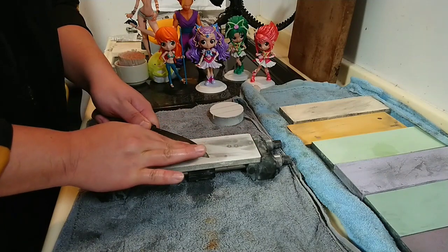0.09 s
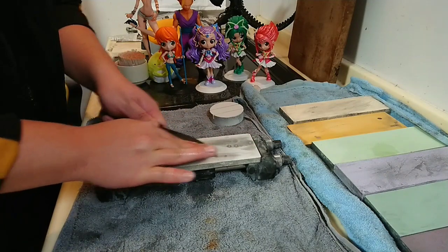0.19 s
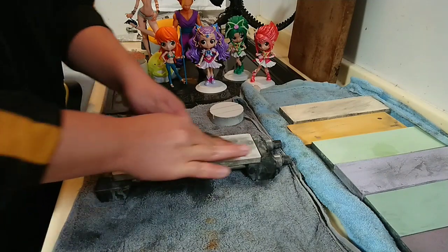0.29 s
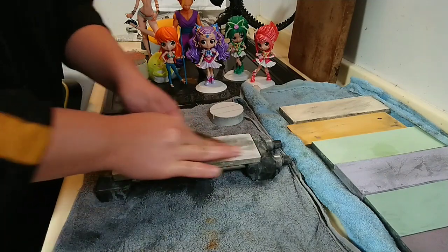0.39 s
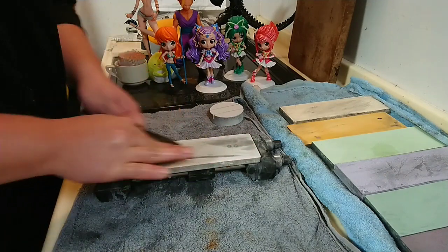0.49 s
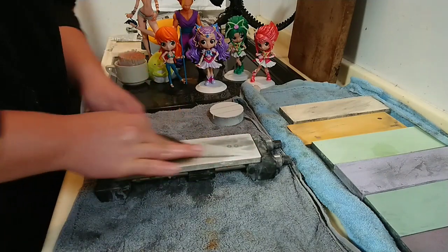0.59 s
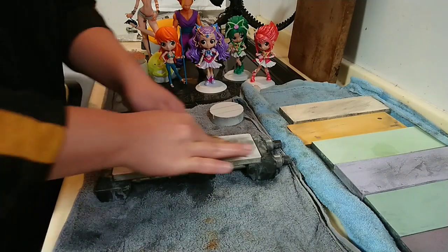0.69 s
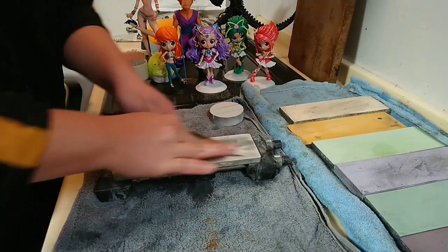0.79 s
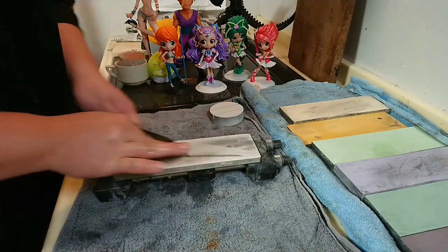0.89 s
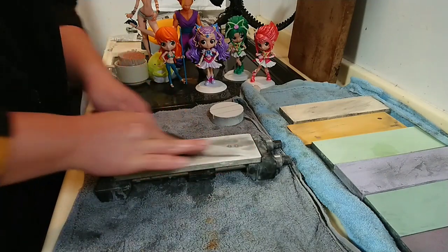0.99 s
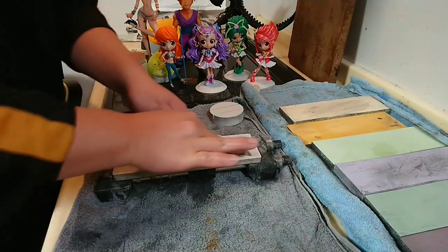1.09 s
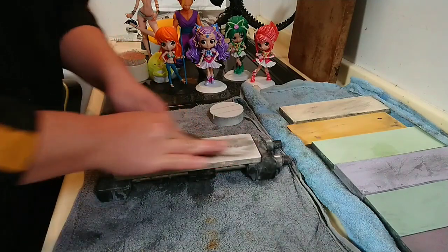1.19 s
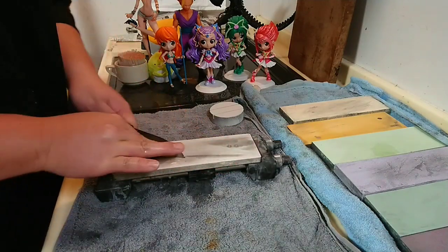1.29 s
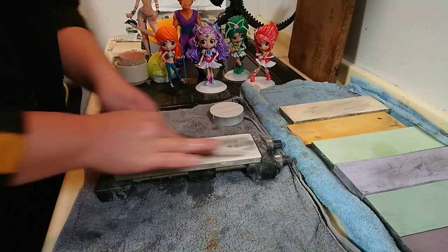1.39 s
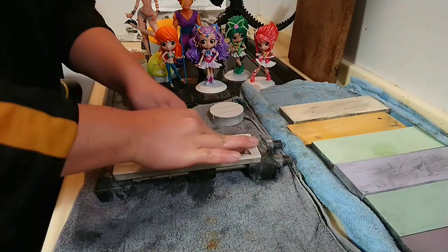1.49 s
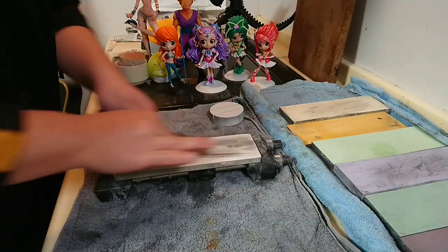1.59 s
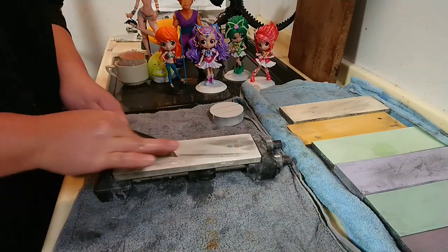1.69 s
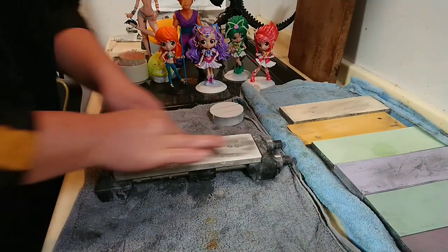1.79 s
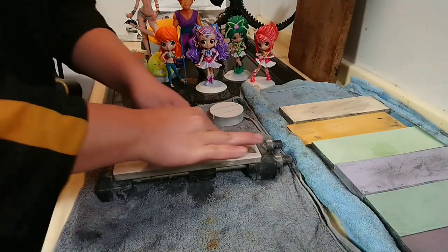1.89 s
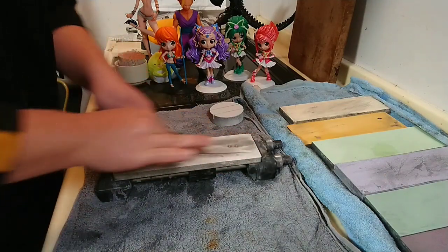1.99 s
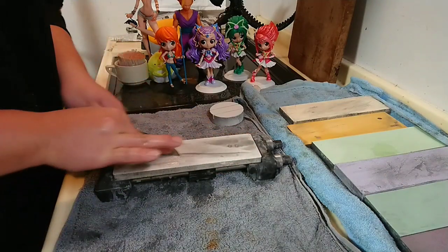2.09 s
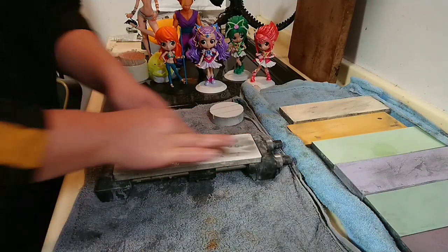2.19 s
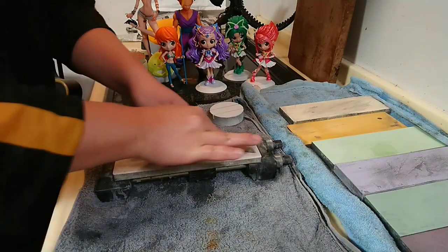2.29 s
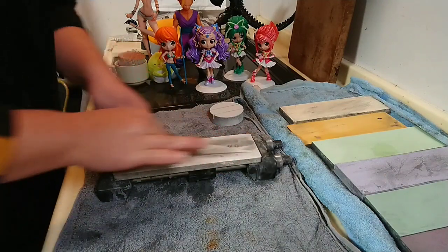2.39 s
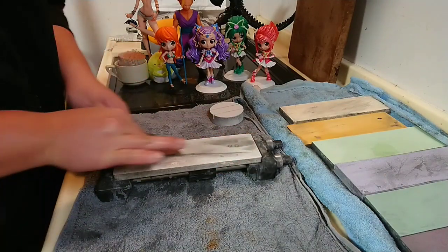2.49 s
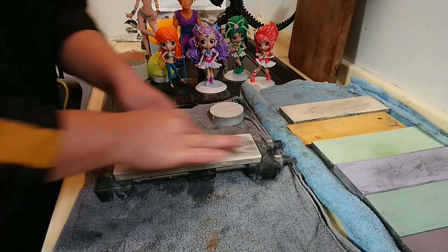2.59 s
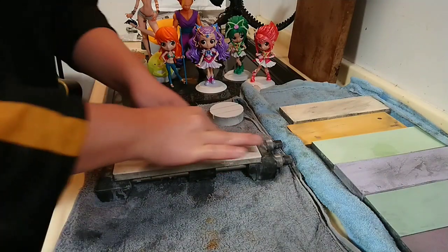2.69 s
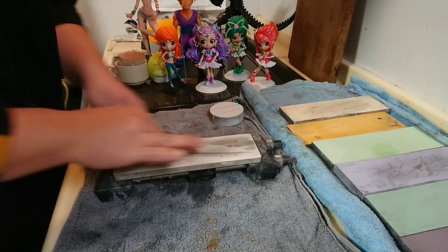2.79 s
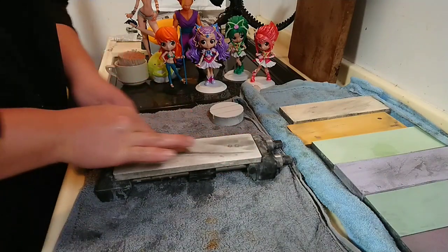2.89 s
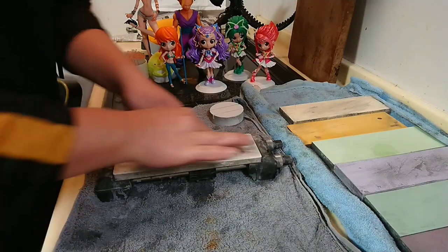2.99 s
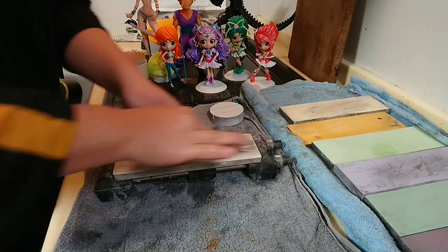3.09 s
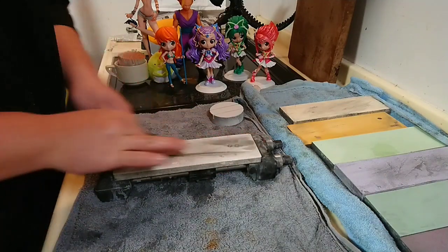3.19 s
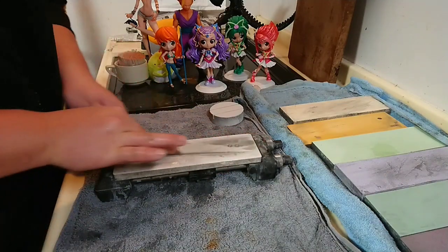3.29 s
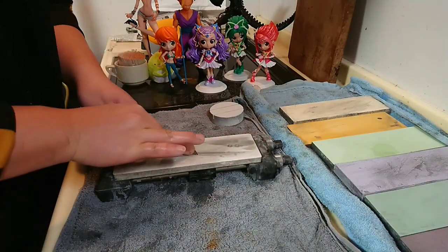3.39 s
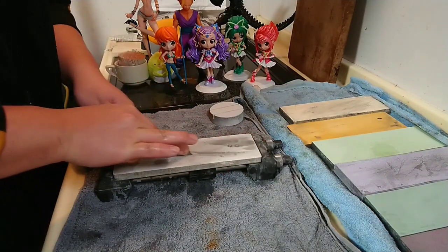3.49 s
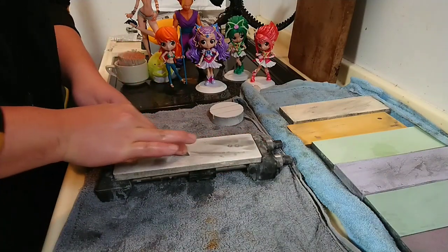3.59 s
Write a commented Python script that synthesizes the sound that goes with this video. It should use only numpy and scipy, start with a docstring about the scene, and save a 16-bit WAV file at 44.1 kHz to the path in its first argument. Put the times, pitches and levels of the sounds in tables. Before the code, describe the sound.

After a brief quiet and a tiny steel touch, rapid bright scrapes of a knife on a sharpening stone run almost without gaps, over soft low rumbles, then weaken with quick ticks. Close stereo microphones indoors.

```python
"""Quiet air, a tiny touch of steel, then a small knife is pushed and pulled along a wet whetstone on a counter,
close to two microphones. Grit clicks and hisses under the edge and rings the blade; colour shifts with the place
on the stone. From the second stroke on, each turn jolts a low rumble into the counter, and here and there a band
sings out or the counter hums. The last strokes are fainter, with quick catches of the edge among them."""
import sys
import numpy as np
from scipy import signal
from scipy.fft import rfft, irfft
from scipy.io import wavfile
from scipy.ndimage import uniform_filter1d

SR = 44100
rng = np.random.default_rng(int(sys.argv[2]) if len(sys.argv) > 2 else 0)


def linear_from_db(decibels):
    """Turn decibels (scalar or array-like) into linear amplitude factors; 0 gives 1."""
    return 10 ** (np.asarray(decibels, float) / 20)


def put_to_file(sound):
    """Save the sound as 16-bit audio at rate SR, in the file named by the first command-line argument."""
    columns = np.atleast_2d(sound).T  # one column per channel
    safe = np.clip(columns, -1, 1)
    whole_steps = np.round(safe * 32767)
    wavfile.write(sys.argv[1], SR, whole_steps.astype(np.int16))


N = 160965  # length in samples

# Background air, a noise spectrum: f/Hz, relative level/dB
AIR_SPECTRUM = [(30, 1), (150, -6.5), (300, -26), (1410, -27), (4500, -39), (10000, -29), (15000, -42)]
AIR_DB = -66  # rms in each microphone

# Alternate pushes and pulls, each ending where the next begins:
# start t/s, level/dB, swell from start to end/dB, bulge/dB (middle up, both ends down by this much)
STROKES = [(0.159, -30, 9, 0), (0.372, -27.5, 1, 1.5), (0.574, -26.5, 5.5, 1), (0.761, -29, -1, 2),
           (0.962, -27, 7.5, 0.5), (1.15, -27, -8.5, 1.5), (1.341, -26, 6.5, 1), (1.525, -27, -4, 0),
           (1.728, -26, 5.5, -0.5), (1.921, -27, -6, 0.5), (2.117, -26, 5, -1.5), (2.308, -26, 2.5, -0.5),
           (2.501, -26.5, 8, -0.5), (2.697, -28, -12, 0.5), (2.896, -26.5, 10, 0), (3.08, -26.5, -3.5, 1),
           (3.285, -34, -9.5, 2.5), (3.438, -43.5, -3, 1.5), (3.605, -44.5, -13, 14)]
LAST_END_S = 3.73
# The blade speeds out of each turn and slows into the next
RISE_S, FALL_S, TURN_DB, BEND = 0.046, 0.06, -22.5, 1.98
FIRST_RISE_S = 0.058  # fade-in of the first stroke
# The edge is set down or catches on the stone: t/s, level/dB, fade time constant/s
TOUCHES = [(0.1335, -61, 0.0056), (0.7786, -35, 0.007), (1.742, -39, 0.013), (2.909, -35, .005),
           (3.481, -37, .003), (3.501, -36, .003), (3.517, -37, .003), (3.617, -46, 0.0021)]
SETTLE_DB = -60  # faint creep from the first touch on
# The edge bites harder for a moment: t/s, boost/dB
BITES = [(0.245, 5.5), (0.489, 3.5), (0.618, 3), (1.865, 1.5), (2.555, 3.5), (2.592, 1)]
BITE_S = 0.013  # bell-curve spread

# Grit: clicks per second, size spread in dB, hiss against clicks as an rms ratio
GRAINS_PER_S, SPREAD_DB, HISS = 6000, 1.5, 0.85
DRAG_DB, DRAG_S = 1.0, 0.0094  # rms swing and smoothing window of the unsteady drag

# Ringing modes of the blade: f/Hz, level over the direct scrape/dB
BLADE_MODES = [(2680, 2), (2894, 3), (3708, 3), (5614, 2), (8886, 1)]
BLADE_T60_S = 0.069

# Scrape colour: f/Hz, left level/dB, right level/dB, change from near to far end of the stone left/dB,
# the same right/dB, left-right likeness (0 to 1)
COLOUR = [(427, -17, -28, -8.5, -11, 0.4), (872, -12.5, -19, -2, -2, 0.34), (996, -18, -22.5, 4.5, 0, 0.13),
          (1413, -4, -3.5, -7.5, -10.5, 1), (2050, -10, -9, -8, -6, 0.27), (2940, -6, -6, 2.5, -1.5, 0.054),
          (3250, 0.5, 1.5, -11, 4.5, 0.26), (3770, 1.5, -7, 3.5, -13, 0.72), (4490, 2, -3, -3, 6.5, 0.038),
          (5190, 10, -27.5, -5.5, -27, 0.085), (5290, 9, -9, 9, -14, .13), (6000, 3.5, 9, -6, 2, .05),
          (6440, -1.5, 1, -3, -7, 0.045), (6840, 6.5, 10, -3, -0.5, 0.51),
          (7830, -3.5, -3, 3.5, -6.5, 0.78), (8840, 1.5, -2.5, -6, -1.5, 0.87),
          (12500, -4, -7.5, -3.5, 0.5, 0.46), (14300, -5.5, -5.5, -2, -3.5, 0.44)]
PATCH_DB = 2.5  # rms of the flicker in colour
# Corner frequencies of the three colour shifts below: f/Hz
LEAN_HZ = [500, 1440, 3800, 12000]
# Colour shift on pulls, at those corners: level/dB
PULL_DB = [5, -1.5, -0.5, -2.5]
# Colour shift as the blade slows, at those corners: level/dB
SLOW_DB = [15, 1.8, 5.1, 0.5]
# Colour shift from start to end, as the hands move along the blade, at those corners: level/dB
DRIFT_DB = [-1, -1, -2.5, 3.7]
# One band of the scrape sings out for part of a stroke: t/s, f/Hz, boost/dB
SINGS = [(.62, 6070, 9.5), (1.25, 3820, 12.5), (2.96, 8850, 6.5), (3.17, 1690, 18)]
SING_S, SING_OCTAVES = 0.016, 0.1  # spreads in time and pitch
LEAD_S, LEAD_TOP_HZ = 0.00016, 6200  # the left microphone hears the part below this first
# Below this frequency little of the scrape is heard during strokes, least of all on pushes
HOLLOW_HZ, HOLLOW_PUSH_DB, HOLLOW_PULL_DB = 720, -33, -11
WET_DB, ROOM_T60_S = -7.5, 0.2

# Counter rumble, a noise spectrum: f/Hz, relative level/dB
COUNTER_SPECTRUM = [(30, -19), (42, 0.5), (54, 3.5), (75, -0.5), (110, -5.5), (135, -11.5), (175, -14),
                    (198, -8), (240, -16.5), (400, -28.5)]
JOLT_DB = -20  # against the stroke level, before the jolt's envelope and doubling
JOLT_RISE_S, JOLT_DECAY_S, RUB_DB = 0.012, 0.081, -48.5
COUNTER_SAME, COUNTER_RIGHT_DB = 0.8, -7.5  # left-right likeness, right against left
LUMP_DB, LUMP_S = 2.2, 0.03  # the rumble comes unevenly: rms swing, smoothing window
# The counter hums briefly on one low note: t/s, f/Hz, peak level/dB
HUMS = [(.61, 199, -52.5), (1.16, 104.4, -43), (1.43, 109.3, -42), (1.56, 215.9, -50.5), (3.53, 113.3, -45),
        (3.63, 111.3, -48)]
HUM_S = 0.047  # bell-curve spread

NOTCH_HZ, NOTCH_WIDTH_HZ = 5920, 650  # narrow hole in the right microphone, width per pass
EDGE_HZ = 15850  # top of the microphones' band


def evened(x):
    """Scales a signal to an rms of one."""
    return x / np.sqrt(np.mean(x ** 2) + 1e-20)


def bell(distance, spread):
    """Smooth bell curve with a peak of one."""
    return np.exp(-(distance / spread) ** 2 / 2)


def wander(window_s):
    """Slow random swing of unit rms: noise smoothed twice."""
    size = int(window_s * SR)
    return evened(uniform_filter1d(uniform_filter1d(rng.standard_normal(N), size), size))


def coloured(points, count):
    """Steady unit-rms noises with the spectrum of the table."""
    hz = np.fft.rfftfreq(N, 1 / SR)
    f, db = np.transpose(points)
    gain = linear_from_db(np.interp(np.log(hz + 1), np.log(f + 1), db, -90, -90))
    return np.array([evened(irfft(rfft(x) * gain, N)) for x in rng.standard_normal((count, N))])


def air():
    """Steady background noise, independent in the two microphones."""
    return linear_from_db(AIR_DB) * coloured(AIR_SPECTRUM, count=2)


def motion():
    """Hands: scrape force, place (0 near, 1 far), (pull, slowness, drift), time since turn, jolt, fade-in."""
    t = np.arange(N) / SR
    start, level_db, swell_db, bulge_db = np.transpose(STROKES)
    edges = np.append(start, LAST_END_S)
    k = np.clip(np.searchsorted(edges, t) - 1, 0, len(start) - 1)  # stroke number
    since, left = np.maximum(t - start[k], 0), edges[k + 1] - t
    progress = since / (since + left)
    slow = np.clip(1 - since / RISE_S, 0, 1) ** BEND + np.clip(1 - left / FALL_S, 0, 1) ** BEND

    db = level_db[k] + swell_db[k] * (progress - 0.5)
    db = db - bulge_db[k] * np.cos(2 * np.pi * progress) + TURN_DB * slow
    db = db + sum(bite_db * bell(t - s, BITE_S) for s, bite_db in BITES)
    first = np.clip((t - start[0]) / FIRST_RISE_S, 0, 1)
    force = linear_from_db(db) * first + linear_from_db(SETTLE_DB) * (t > TOUCHES[0][0])
    for s, touch_db, fade in TOUCHES:
        force = force + linear_from_db(touch_db) * (t > s) * np.exp(-np.maximum(t - s, 0) / fade)
    force = uniform_filter1d(force, 16)

    place = 0.5 - 0.5 * np.cos(np.pi * progress) * (-1) ** k
    pull = uniform_filter1d(k % 2 * 1.0, 1000)
    drift = t / t[-1] - 0.5
    jolt = linear_from_db(level_db[k] + JOLT_DB) * (k > 0)
    return force, place, (pull, slow * first, drift), since, jolt, first


def grit():
    """Abrasive grains: random clicks of uneven size over fine hiss, with an unsteady drag."""
    size = linear_from_db(SPREAD_DB * np.minimum(rng.exponential(1, N), 4.5))
    struck = rng.random(N) < GRAINS_PER_S / SR
    clicks = size * struck * rng.choice([-1, 1], N)
    rough = evened(clicks) + HISS * rng.standard_normal(N)
    return evened(rough * linear_from_db(DRAG_DB * wander(DRAG_S)))


def blade(x):
    """The grit passes directly and also rings the decaying modes of the steel."""
    out = x
    for hz, db in BLADE_MODES:
        r = np.exp(-np.pi * 2.2 / BLADE_T60_S / SR)  # decay per sample
        turn = np.exp(2j * np.pi * hz / SR)
        out = out + linear_from_db(db) * 2 * signal.lfilter([1 - r], [1, -r * turn], x).real
    return out


def room(x):
    """Short sparse tail of decaying echoes, different for each side."""
    t = np.arange(SR // 3) / SR
    taps = rng.choice([-1.0, 1.0], (2, len(t))) * (rng.random((2, len(t))) < 0.05)
    taps = taps * linear_from_db(-60 * t / ROOM_T60_S) * (t > 0.003)
    return signal.fftconvolve(x, taps / np.linalg.norm(taps[0]), axes=1)[:, :N]


def scrape(force, place, manner):
    """Two streams of grit ring the blade, then are mixed and coloured for each side by place and motion."""
    hz, t, z = signal.stft(blade(np.array([grit(), grit()]) * force), SR, nperseg=256, noverlap=192)
    clock = np.arange(N) / SR
    f, *columns = np.transpose(COLOUR)
    left_db, right_db, far_left_db, far_right_db, same = (np.interp(hz, f, c)[:, None] for c in columns)
    same = np.clip(same, 0, 1)
    far = np.interp(t, clock, place) - 0.5

    patch = uniform_filter1d(uniform_filter1d(rng.standard_normal((len(t), len(hz))), 45, 0), 2, 1)
    shift_db = PATCH_DB * evened(patch).T
    for db, share in zip((PULL_DB, SLOW_DB, DRIFT_DB), manner):
        lean = np.interp(np.log(hz + 1), np.log(LEAN_HZ), db)
        shift_db = shift_db + np.outer(lean, np.interp(t, clock, share))
    for s, sing_hz, db in SINGS:
        band = bell(np.log2(hz / sing_hz + 1e-9), SING_OCTAVES * np.sqrt(0.5) * np.sqrt(2))
        shift_db = shift_db + db * np.outer(band, bell(t - s, SING_S))

    # The level falls steeply below the lowest table frequency
    shared = np.clip(hz / f[0], 0, 1)[:, None] ** 4 * linear_from_db(shift_db)
    lead = (2 * np.pi * hz * LEAD_S * (hz < LEAD_TOP_HZ))[:, None]
    left = z[0] * linear_from_db(left_db + far_left_db * far) * shared
    right = same * np.exp(-1j * lead) * z[0] + np.sqrt(1 - same ** 2) * z[1]
    right = right * linear_from_db(right_db + far_right_db * far) * shared
    direct = signal.istft(np.array([left, right]), SR, nperseg=256, noverlap=192)[1][:, :N]
    direct = direct * np.sqrt(np.mean(force ** 2) / np.mean(direct.mean(0) ** 2))

    heard = direct + linear_from_db(WET_DB) * room(direct)
    body = signal.sosfiltfilt(signal.butter(6, HOLLOW_HZ, fs=SR, output="sos"), heard)
    pull, slow, _ = manner
    hollow_db = HOLLOW_PUSH_DB + (HOLLOW_PULL_DB - HOLLOW_PUSH_DB) * pull
    return heard - body * (1 - linear_from_db(hollow_db * np.clip(1 - slow, 0, 1)))  # the band below it is heard in full again at the turns


def counter(since, jolt, first):
    """Low rumble of stone, holder and counter: jolts after turns over steady rubbing, and short sine hums."""
    t = np.arange(N) / SR
    a, b = coloured(COUNTER_SPECTRUM, count=2)
    right = COUNTER_SAME * a + np.sqrt(1 - COUNTER_SAME ** 2) * b
    rumble = np.array([a, linear_from_db(COUNTER_RIGHT_DB) * right])
    thump = 2 * jolt * (1 - np.exp(-since / JOLT_RISE_S)) * np.exp(-since / JOLT_DECAY_S)
    shape = uniform_filter1d(thump + linear_from_db(RUB_DB) * first, 600)
    hums = np.zeros(N)
    for s, hz, db in HUMS:
        hums += linear_from_db(db) * bell(t - s, HUM_S) * np.sin(2 * np.pi * (hz * t + rng.random()))
    return rumble * shape * linear_from_db(LUMP_DB * wander(LUMP_S)) + np.outer([1, linear_from_db(COUNTER_RIGHT_DB)], hums)


def scene():
    """Air, scrape and counter rumble, the last two driven by the same hands."""
    force, place, manner, since, jolt, first = motion()
    return air() + scrape(force, place, manner) + counter(since, jolt, first)


def roll_off(x):
    """The treble ends steeply here."""
    return signal.sosfilt(signal.butter(12, 16290, fs=SR, output="sos"), x)


def record(dry):
    """Microphones: a narrow hole on the right, notched twice, and a steep top to the band on both sides."""
    hole = signal.iirnotch(NOTCH_HZ, NOTCH_HZ / NOTCH_WIDTH_HZ, SR)
    right = signal.lfilter(*hole, signal.lfilter(*hole, dry[1]))
    low_pass = signal.firwin(511, EDGE_HZ, window=("kaiser", 9), fs=SR)
    mix = signal.oaconvolve(np.array([dry[0], right]), low_pass[None], "same")
    return roll_off(mix)


dry = scene()
out = record(dry)
put_to_file(out)
```